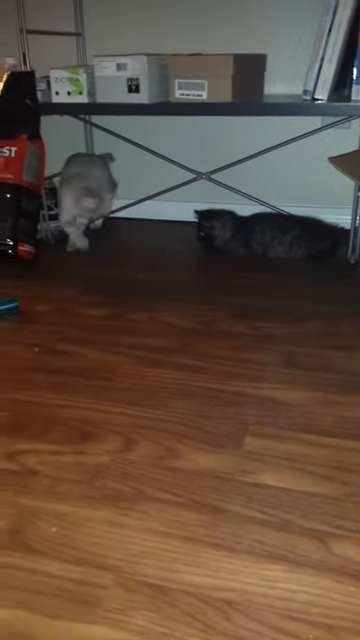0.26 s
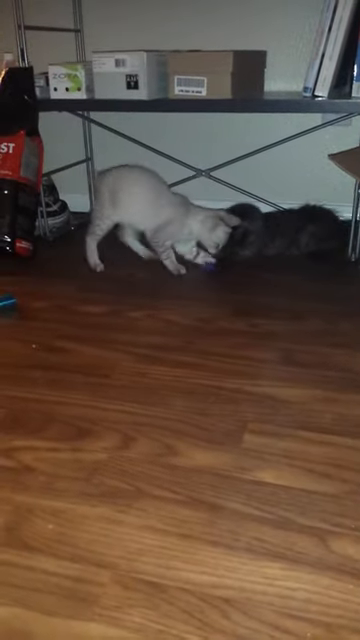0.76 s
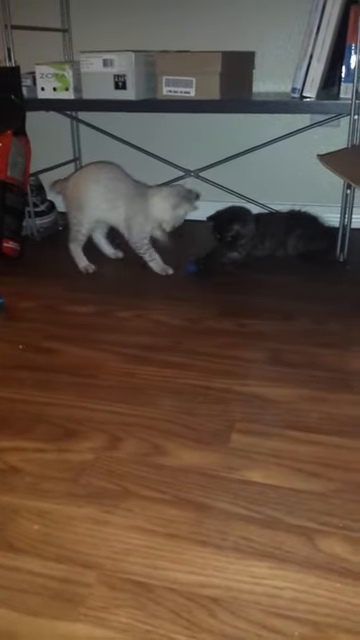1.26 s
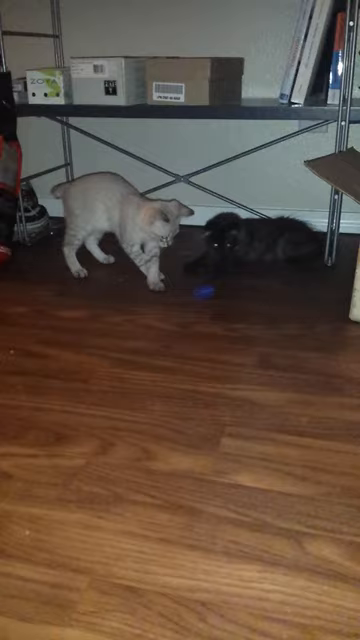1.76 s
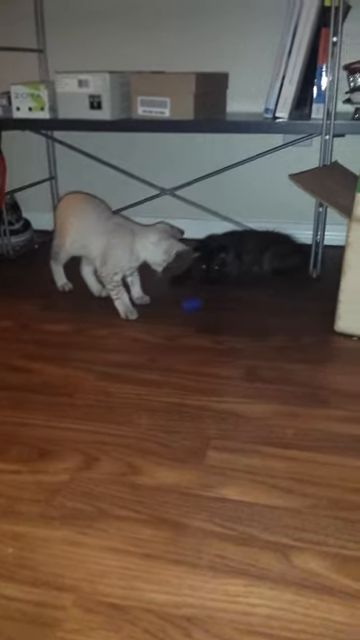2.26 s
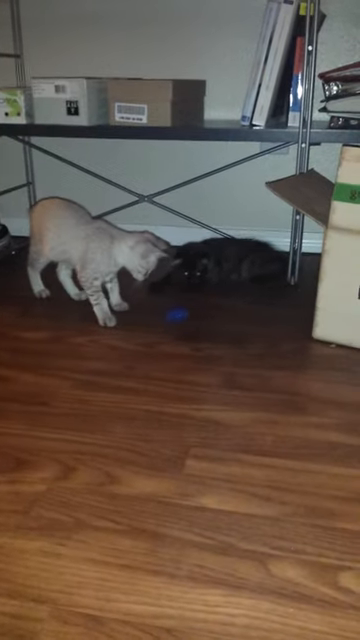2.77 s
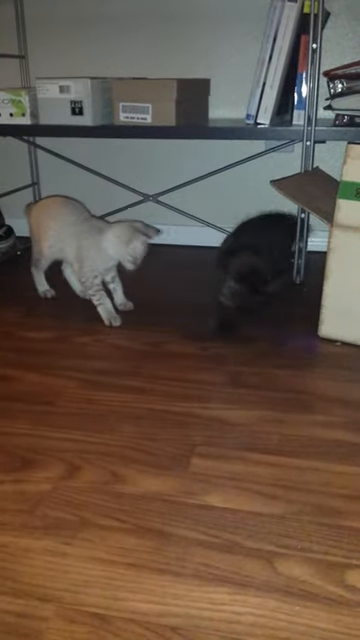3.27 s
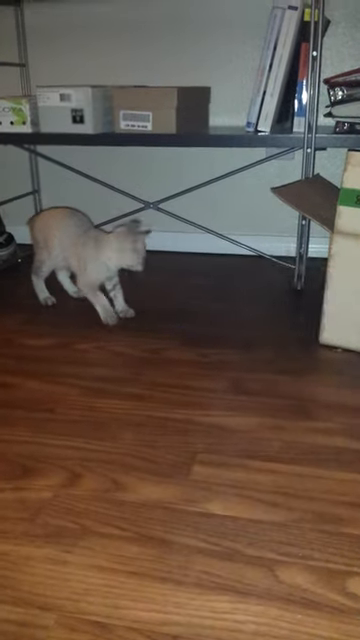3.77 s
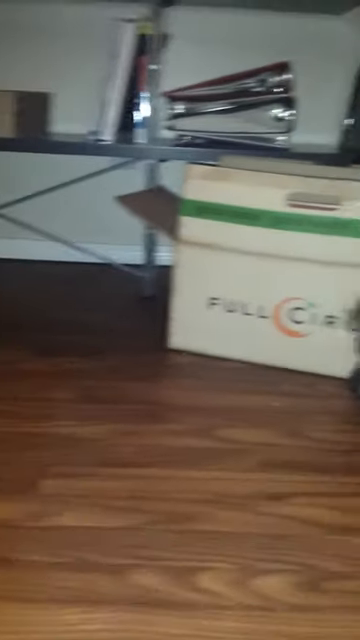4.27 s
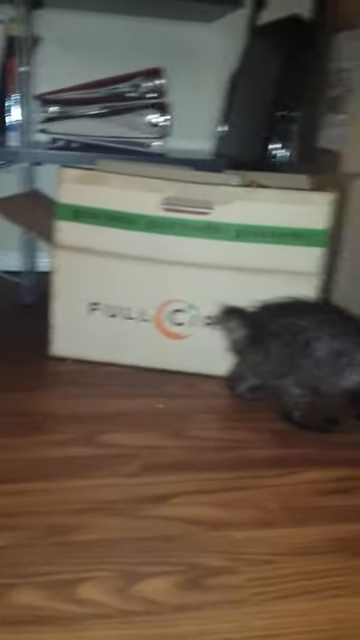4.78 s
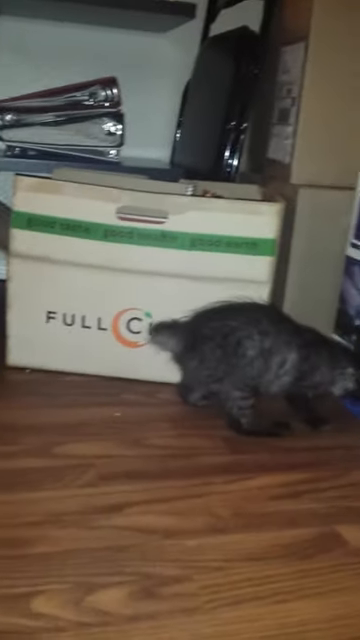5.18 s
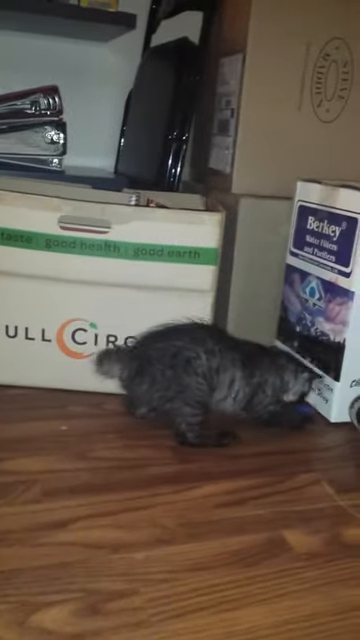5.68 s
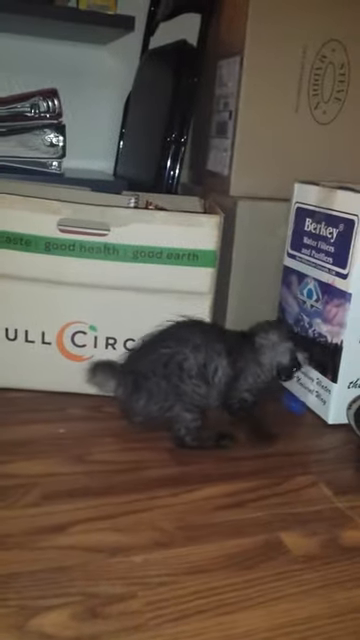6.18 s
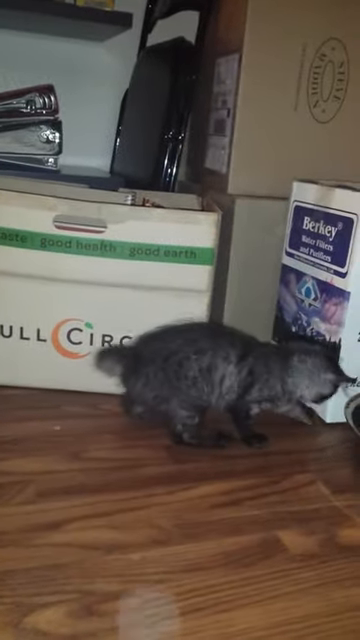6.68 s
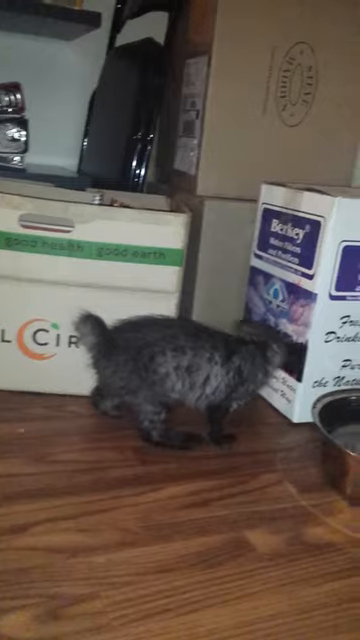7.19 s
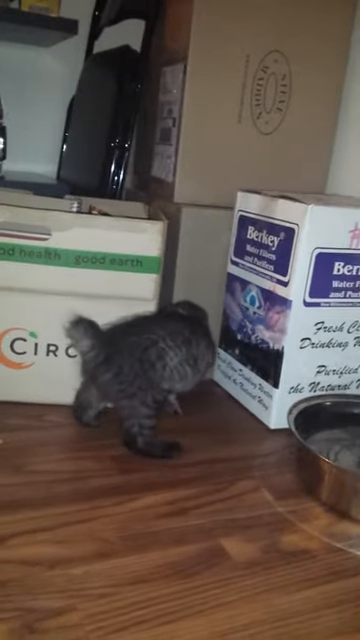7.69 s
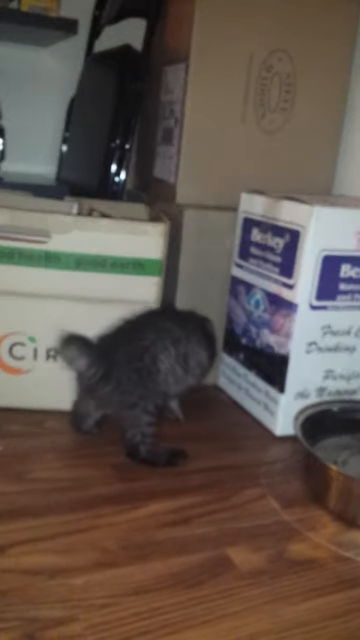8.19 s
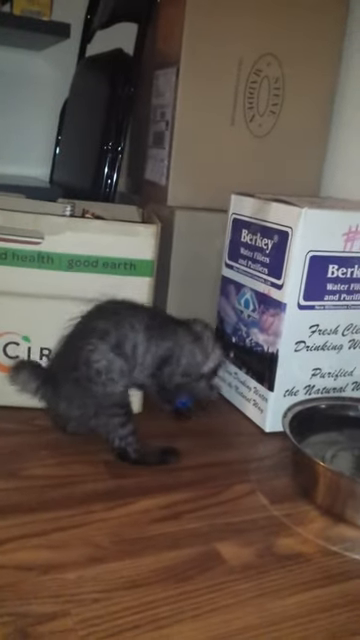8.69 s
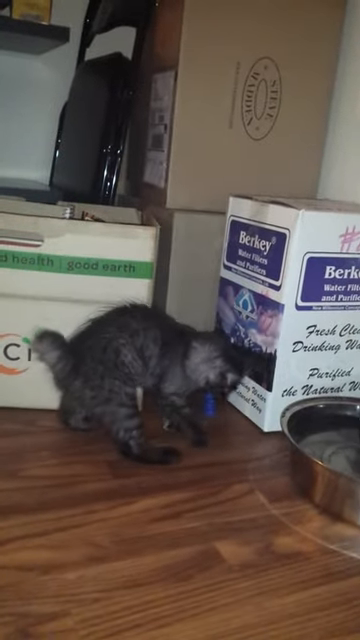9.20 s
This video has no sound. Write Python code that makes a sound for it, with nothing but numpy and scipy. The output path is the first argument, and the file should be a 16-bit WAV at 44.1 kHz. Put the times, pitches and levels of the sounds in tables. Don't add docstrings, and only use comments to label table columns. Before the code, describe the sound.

A quiet small room with a wooden floor, heard through a hand-held stereo phone. Throughout, a faint mains-pitched pump hum swells and dips under soft air hiss, while a fountain drips, spits and patters in tiny bright bubbles. The first three seconds are sparse: slight finger clicks on the phone, a faint paw rub and tick; a sharper finger click comes at 3.0. From 3.4 a hard plastic toy bumps and clacks, cracks and pings at 3.6, then clatters most loudly at 3.9-4.05 with low paw thuds. From 4.1 to 7 it is mostly water and hum, with close finger clicks around 5.2-5.4 and small ticks. Box bumps at 7.1 lead to a second burst at 7.6-7.9: knocks, pings and a rough scrape. Short rubs follow at 8.0-8.1 and a last bump at 8.3. A thin high motor hiss runs from 8.1 to 9.2, then water and hum remain until about 9.4.

```python
import sys
import numpy as np
from scipy import signal
from scipy.fft import rfft, irfft
from scipy.io import wavfile

SR = 44100
rng = np.random.default_rng(int(sys.argv[2]) if len(sys.argv) > 2 else 0)


def amplitude_ratio(level_db):
    exponent = np.asarray(level_db, float) / 20
    return 10 ** exponent


def file_out(sig):
    cols = np.atleast_2d(sig).T
    lim = np.clip(cols, -1, 1)
    pcm = np.round(lim * 32767).astype(np.int16)
    wavfile.write(sys.argv[1], SR, pcm)


N = 416744
HZ = np.maximum(np.fft.rfftfreq(N, 1 / SR), 1)


def rms_one(x):
    return x / np.sqrt(np.mean(x ** 2) + 1e-20)


def at_hz(points, hz):
    table_hz, values = np.array(points).T
    return np.interp(np.log(hz), np.log(table_hz), values)


def in_time(rows, outside=None):
    s, *columns = np.transpose(rows)
    return [np.interp(np.arange(N) / SR, s, c, outside, outside) for c in columns]


def band(x, low_hz, high_hz):
    sos = signal.butter(2, [low_hz, min(high_hz, .45 * SR)], "band", fs=SR, output="sos")
    return signal.sosfilt(sos, x)


def add(track, s, sound):
    i = round(s * SR)
    track[..., i:i + sound.shape[-1]] += sound[..., :N - i]


def stereo_pair(mid, side, likeness):
    alike = np.clip(likeness, 0, 1)
    return np.sqrt(1 + alike) * mid + np.sqrt(1 - alike) * side * [[1], [-1]]


def bubble(hz, cycles, rise):
    t = np.arange(1500) / SR
    return np.sin(2 * np.pi * hz * t * (1 + rise * hz * t / cycles)) * amplitude_ratio(-60 * t * hz / cycles)


# start_s, second_order_db, seventh_order_db
HUM_SWELL = [(0.0, -65, -65.5), (0.37, -65, -64.5), (0.97, -67, -65), (2.31, -69.5, -65), (3.1, -73, -67),
             (3.53, -72, -62.5), (4.05, -67, -60), (4.29, -72.5, -63.5), (4.82, -84.5, -63.5),
             (5.05, -79.5, -66.5), (6.18, -81, -63.5), (6.45, -69, -65), (7.27, -71.5, -65.5),
             (7.7, -64, -62), (9.0, -65.5, -63.5), (9.45, -64.5, -64.5)]
# order, level_db (rms)
STEADY_ORDERS = [(1, -109.5), (3, -78), (4, -77.5), (5, -78.5), (8, -81)]


def pump():
    mains_hz = 60.0
    turn = 2 * np.pi * mains_hz * np.arange(N) / SR
    second_db, seventh_db = in_time(HUM_SWELL)
    hum = sum(amplitude_ratio(db) * np.sin(order * turn + order) for order, db in STEADY_ORDERS)
    hum = hum + amplitude_ratio(second_db) * np.sin(2 * turn)
    seventh_lean = amplitude_ratio(np.array([[-1.5], [1.5]]))
    seventh = amplitude_ratio(seventh_db + 1.5) * np.sin(7 * turn) * seventh_lean
    return np.sqrt(2) * (hum + seventh)


# pitch_hz, level_db (per Hz)
AIR_COLOUR = [(20, -20.5), (40, -19.5), (85, -7), (180, -12), (260, -16.5), (340, -1), (390, -10),
              (520, -13.5), (700, -19), (1500, -22.5), (2600, -22), (5900, -23), (8000, -21), (14500, -25)]
# pitch_hz, likeness (0 to 1)
AIR_LIKENESS = [(60, 0.41), (130, 0.49), (290, 0.81), (640, 0.26), (1400, 0), (3000, 0.024)]


def air():
    mean_db, follows = -74.0, 1
    seventh_db = in_time(HUM_SWELL)[1]
    level_db = mean_db + follows * (seventh_db - seventh_db.mean())
    mid, side = rfft(rng.standard_normal((2, N)))
    pair = stereo_pair(mid, side, at_hz(AIR_LIKENESS, HZ))
    return amplitude_ratio(level_db + 14.5) * rms_one(irfft(pair * amplitude_ratio(at_hz(AIR_COLOUR, HZ)), N))


def strays(count, least_db, low_hz, high_hz):
    spread_db = 6.0
    when, pitch, size = rng.random((count, 3)).T
    start_s = when * (N - SR // 20) / SR
    return list(zip(start_s, least_db + spread_db * size, low_hz * (high_hz / low_hz) ** pitch))


FLICKS = [0.022, 0.243, 0.7135, 0.919, 1.14, 1.1792, 1.645, 2.4367, 2.577, 3.3832, 4.8113, 5.115, 5.2574,
          5.543, 5.6463, 5.693, 5.86, 6.1067, 6.1874, 6.675, 6.867, 6.918, 7.054, 7.1445, 8.161, 8.434,
          8.7055, 8.9896, 9.056, 9.185]
# start_s, peak_db, pitch_hz
SPLASHES = [(0.6744, -52, 5530), (0.7048, -44, 6400), (1.4414, -43, 5560), (2.3885, -43, 5240),
            (2.5306, -47, 5440), (2.7262, -46, 6840), (3.045, -45, 5250), (3.266, -42, 7180),
            (3.3604, -43, 6210), (4.1703, -40.5, 6200), (4.285, -44.5, 5760), (4.3529, -37.5, 6000),
            (4.5025, -42.5, 7300), (4.7949, -47, 6300), (4.8906, -44, 6160), (5.8056, -44.5, 6400),
            (6.162, -44, 5140), (6.279, -46.5, 7400), (8.272, -42, 5940), (8.2935, -43, 4240),
            (6.2535, -40.5, 5650), (6.3493, -44, 5100), (6.704, -46, 6040), (7.4843, -42.5, 6480),
            (8.467, -44.5, 5120), (8.5479, -42.5, 5642), (8.7195, -43.5, 5899), (8.8103, -40, 6150),
            (8.8671, -44.5, 6660), (9.1051, -43, 5418), (9.2114, -48.5, 5580), (9.2967, -47.5, 5470)]
# start_s, peak_db
SPITS = [(0.9793, -48), (1.048, -49), (1.4227, -51), (1.754, -47.5), (1.916, -44.5), (2.048, -41),
         (2.2752, -53), (2.37, -43), (2.7034, -46), (2.95, -45), (4.2458, -44.5), (4.527, -45),
         (4.708, -56), (4.97, -46), (6.312, -46), (6.578, -53.5), (7.112, -44), (7.444, -45.5),
         (9.1134, -47.5)]


def splashes():
    spit_hz, flick_db = 4434, -52
    rows = SPLASHES + [(s, db, spit_hz) for s, db in SPITS]
    rows = rows + strays(28, -61, 5130, 7400)
    chance = strays(len(FLICKS), flick_db, 5440, 7220)
    rows = rows + [(s, db, hz) for s, (_, db, hz) in zip(FLICKS, chance)]
    out = np.zeros(N)
    for s, peak_db, hz in rows:
        add(out, s, amplitude_ratio(peak_db - 3.5) * bubble(hz, cycles=60.0, rise=.02))
        for late, pitch, size in rng.random((3, 3)):
            small = bubble(hz * 1.8 ** (pitch - .4), cycles=45.0, rise=0.11)
            add(out, s + 0.015 * late, amplitude_ratio(peak_db - 9.0 - size) * small)
    return out


def patter():
    out = np.zeros(N)
    for s, peak_db, hz in strays(330, -58.5, 4090, 7800):
        add(out, s, amplitude_ratio(peak_db) * bubble(hz, cycles=40.0, rise=.04))
    return out


# start_s, pitch_hz
DRIPS = [(0.097, 3240), (0.3262, 2170), (0.483, 1870), (0.934, 3080), (0.996, 2570), (1.248, 2530),
         (1.3806, 2254), (1.437, 2920), (1.7754, 2600), (1.7987, 1950), (2.4249, 3700), (2.761, 2702),
         (2.8275, 3660), (4.609, 2270), (4.803, 3500), (5.137, 3340), (5.6565, 3570), (5.996, 2110),
         (6.462, 3550), (6.5763, 2420), (6.878, 1790), (7.2118, 2036), (7.5607, 3150), (8.149, 1980),
         (8.6454, 3350), (8.7623, 2400), (9.026, 2500), (9.4304, 2880)]
# start_s, peak_db, pitch_hz
DROPS = [(0.697, -44.5, 3630), (0.8082, -48, 3370), (0.9597, -48, 2260), (1.5655, -38, 1830),
         (1.892, -50.5, 2300), (1.945, -49.5, 2670), (2.199, -41, 3350), (2.3143, -46, 2050),
         (3.026, -44, 3050), (3.039, -42.5, 3060), (3.278, -56, 2660), (4.4812, -44, 2110),
         (4.533, -44, 1790), (4.749, -51.5, 2040), (5.299, -45, 3420), (5.599, -47.5, 2750),
         (5.8095, -47.5, 1930), (5.89, -44.5, 2680), (6.0466, -52.5, 1757), (6.0832, -43.5, 2240),
         (6.085, -49.5, 1490), (6.154, -42, 3000), (6.19, -60, 3070), (6.154, -47, 2060),
         (8.296, -43, 2930), (0.567, -49.5, 3470), (6.512, -48, 2800), (6.677, -42, 1860),
         (6.7046, -44.5, 2130), (7.422, -41.5, 2170), (7.4477, -46.5, 2080), (8.3578, -47, 1990),
         (8.414, -54, 3040), (8.435, -40.5, 3280), (8.436, -49, 2450), (6.127, -57, 2270),
         (6.24, -58, 2350), (0.647, -54.5, 2300), (8.464, -47, 1840)]


def drops():
    drip_db = -52.5
    rows = DROPS + [(s, drip_db, hz) for s, hz in DRIPS] + strays(12, -64, 1940, 4800)
    out = np.zeros(N)
    for s, peak_db, hz in rows:
        add(out, s, amplitude_ratio(peak_db - 3.5) * bubble(hz, cycles=40.0, rise=.03))
    return out


# start_s, peak_db, pitch_hz
GRIPS = [(0.4, -49, 4800), (0.49, -47, 4300), (0.629, -41.5, 4000), (1.5655, -38, 6100), (6.083, -50, 3200),
         (2.9975, -37, 10500), (3.024, -46, 5600), (2.9982, -44.5, 2780), (5.339, -51, 670),
         (5.408, -46.5, 4200), (0.936, -54, 2440), (8.459, -41, 3200), (7.056, -46, 6400),
         (2.951, -42, 8500), (2.999, -29.5, 6100), (3.131, -51, 11000), (5.2238, -46, 6200),
         (5.227, -51.5, 2500), (5.2745, -37.5, 4660), (5.3205, -38.5, 4720), (5.339, -50.5, 1590),
         (5.382, -37.5, 9550), (6.1525, -41, 6000), (8.459, -37.5, 5600)]


def grips():
    attack_s = 0.00015
    out, soft = np.zeros(N), 1 - np.exp(-np.arange(1500) / SR / attack_s)
    for s, peak_db, hz in GRIPS:
        click = bubble(hz, cycles=19.0, rise=0) + 0.53 * bubble(0.79 * hz, cycles=20.0, rise=0)
        add(out, s, amplitude_ratio(peak_db + 3.0) * soft * click)
    return out


# pitch_hz, width_hz, level_db
SLIDE_BODY = [(600, 180, -1), (1260, 260, -6), (2050, 300, -4.5), (2500, 350, -2)]
# start_s, peak_s, end_s, body_db, hiss_db
SLIDES = [
    (0.64, 0.684, 0.77, -62, -54),
    (3.49, 3.505, 3.8, -67, -52),
    (3.737, 3.76, 3.77, -59, -42.5),
    (3.828, 3.86, 3.92, -48.5, -42),
    (7.68, 7.692, 7.27, -54, -46),
    (7.767, 7.79, 7.812, -34, -33),
    (8.012, 8.035, 8.08, -49.5, -48),
    (8.04, 8.087, 8.128, -40.5, -41.5),
    (3.26, 3.28, 3.34, -61.5, -53),
]


def slides():
    edge_db, hold, catches_per_s = -18, 0.65, 5000
    strength = amplitude_ratio(1.5 * np.minimum(rng.exponential(1, N), 3))
    catches = rng.standard_normal(N) * strength * (rng.random(N) < catches_per_s / SR)
    body = sum(amplitude_ratio(db) * rms_one(band(catches, hz - width / 2, hz + width / 2))
               for hz, width, db in SLIDE_BODY)
    hiss = rms_one(band(catches, 4800, 7200))
    hiss = hiss + .35 * rms_one(band(catches, 8000, 13000)) + .25 * rms_one(band(catches, 3000, 4500))
    out = 0
    for start, peak, end, body_db, hiss_db in SLIDES:
        fade_s = peak + hold * (end - peak)
        shape = [(start, edge_db), (peak, 0), (fade_s, -2), (end, edge_db)]
        swell_db = in_time(shape, outside=-120)[0]
        out = out + amplitude_ratio(swell_db) * (amplitude_ratio(body_db - 9) * body + amplitude_ratio(hiss_db - 7.5) * hiss)
    return out


# start_s, peak_db, pitch_hz
THUDS = [(0.69, -46.5, 116), (0.9, -56, 104), (3.421, -41.5, 317.5), (3.63, -44, 90), (3.879, -45, 157),
         (3.948, -37.5, 184), (4.001, -30.5, 227), (4.011, -28.5, 177), (4.793, -51, 190),
         (5.299, -54, 214), (7.629, -43, 142), (8.307, -52, 255), (8.869, -57, 123), (9.239, -48, 123)]


def thuds():
    out, t = np.zeros(N), np.arange(6000) / SR
    for s, peak_db, hz in THUDS:
        push = np.sin(2 * np.pi * hz * t) + 0.56 * np.sin(2 * np.pi * 1.9 * hz * t)
        add(out, s, amplitude_ratio(peak_db - 0.5) * push * amplitude_ratio(-60 * t / 0.12) * (1 - np.exp(-t / 0.00074)))
    return out


# start_s, peak_db, crack_db (re peak), toy_hz
TICKS = [(0.697, -52, 4, 3270), (1.4445, -59.5, 16.5, 2730), (3.797, -43.5, 1.5, 1490),
         (3.84, -51, 8, 2050), (3.869, -40.5, 6, 2080), (3.912, -49, 7, 965), (4.794, -50, 4, 1030),
         (5.808, -52.5, 9, 1870), (6.675, -54, -5, 1830), (7.0232, -48.5, 7.5, 1503),
         (7.423, -48, 2.5, 2190), (8.0248, -56, 0, 3040), (8.046, -47, 6, 1260)]
# start_s, peak_db, knock_db (re peak), crack_db (re peak), knock_hz
BUMPS = [(3.2679, -53, 4, 11.5, 830), (3.276, -51.5, 1, 8, 835), (3.4213, -37.5, 9, 8, 507),
         (3.426, -38.5, 8, -3, 407), (3.434, -39.5, 8.5, -7, 500), (3.4755, -32, 11.5, -12, 950),
         (4.0118, -22.5, 5.5, -1, 605), (7.1114, -34.5, 4.5, -1, 640), (7.1444, -32.5, 0, -9, 620),
         (7.6274, -20.5, 3, -10, 490), (7.6385, -31.5, 6.5, -17, 560), (7.682, -43, 6, -9, 915),
         (7.687, -30, 5, -5, 895), (7.7788, -29, 6.5, -4, 607), (7.7885, -28, 3.5, -5, 620),
         (7.795, -46, 4, -9, 603), (7.832, -27.5, -7, -14, 600), (7.859, -41, 6, -9, 684),
         (8.2915, -38.5, 2, -2, 510), (8.296, -39, -4, 4, 1020), (8.3072, -25, -1.5, -7.5, 510),
         (8.3238, -45, 13.5, -4, 503)]
# start_s, peak_db, knock_db (re peak), crack_db (re peak), toy_hz
CLACKS = [(3.467, -23, -6, -6, 2100), (3.4722, -23, -5, -3, 1680), (3.492, -36, -4, 8, 1470),
          (3.4948, -33.5, -18, 1, 1654), (3.6319, -22.5, -13.5, 4, 1880), (3.6366, -24.5, -9.5, 7, 1004),
          (3.859, -36.5, -17, -3, 984), (3.9449, -15, -16, 6.5, 1640), (3.9485, -19.5, -13, 4.5, 3110),
          (3.9527, -16.5, -7.5, -3, 1540), (3.994, -18, -4.5, -12, 1294), (3.9994, -15.5, -18, -2, 2620),
          (4.0011, -7.5, -32.5, -2.5, 1785), (4.0123, -23.5, -18.5, 5, 1350), (4.023, -28, -11.5, -2, 1180),
          (4.031, -19, -7, -3.5, 1014), (4.038, -22, -7, -5, 970), (6.7048, -39, -21, -1, 1165),
          (7.1445, -30, -15, -5.5, 1920), (7.6053, -18, -18, 4, 2950), (7.6324, -16, -14, -7.5, 1280),
          (7.6574, -21.5, -25.5, 2, 2630), (7.664, -30.5, -9, 6, 2786), (7.7618, -24.5, 0, -3.5, 1294),
          (7.791, -26, -24, -8, 2320), (7.8218, -20.5, 1, -2, 2795), (7.8243, -34, 0, 7, 2540),
          (8.0754, -38, -17, -10, 2490), (8.2781, -29, -7.5, -11.5, 1230)]


def contacts():
    board_hz, toy_on_box_hz = 585, 989
    tick_knock_hz, tick_knock_db = 434, -1.5
    ticks = [(s, db, tick_knock_db, crack_db, tick_knock_hz, hz) for s, db, crack_db, hz in TICKS]
    bumps = [(*row, toy_on_box_hz) for row in BUMPS]
    clacks = [(*row, board_hz, hz) for *row, hz in CLACKS]
    return ticks + bumps + clacks


def ringing(main_hz, others, span, below, t60):
    contact_s, main_weight = 0.0019, 1.84
    t = np.arange(2400)[:, None] / SR
    place = (np.arange(others) + rng.random(others)) / others - below
    hz = main_hz * np.r_[1, span ** place]
    gains, turns = rng.random((2, others + 1))
    gains[0] = main_weight
    fade = amplitude_ratio(-60 * np.maximum(t - contact_s, 0) / t60) * (1 - np.exp(-t / 0.000043))
    rings = (gains * np.sin(2 * np.pi * (hz * t + turns)) * fade).sum(axis=1)
    return rings / np.abs(rings).max()


# pitch_hz, level_db
CRACK_COLOUR = [(2500, 5.5), (3500, 6), (4800, 4), (6000, 3.5), (7500, -3), (10000, -19), (15000, -21)]


def blows():
    out, t = np.zeros(N), np.arange(2400) / SR
    snap_db = 1.5
    colour = amplitude_ratio(at_hz(CRACK_COLOUR, np.maximum(np.fft.rfftfreq(2400, 1 / SR), 1)))
    snap = band(1. * (np.arange(2400) == 0), 1504, 8500) * 2
    crack_fade = amplitude_ratio(-60 * t / 0.0071) + 0.39 * amplitude_ratio(-60 * t / 0.055)
    for s, peak_db, knock_db, crack_db, knock_hz, toy_hz in contacts():
        knock = ringing(knock_hz, others=7, span=2.0, below=.42, t60=0.021)
        knock = knock * (1 - np.exp(-t / 0.00088))
        body = ringing(toy_hz, others=11, span=2.8, below=.45, t60=0.024)
        grit = irfft(rfft(rng.standard_normal(2400)) * colour)
        crack = band(grit * crack_fade, 2820, 13800)
        crack = crack / np.abs(crack).max() + amplitude_ratio(snap_db) * snap
        blow = body + amplitude_ratio(knock_db) * knock + amplitude_ratio(crack_db + 4.5) * crack
        add(out, s, amplitude_ratio(peak_db - 2.5) * blow)
    return band(out, 98, 15000)


# start_s, peak_db, pitch_hz
PINGS = [(3.42, -42, 7650), (3.492, -38, 7660), (3.634, -17.5, 6240), (3.632, -33, 9800),
         (3.632, -23, 1850), (3.637, -27, 1150), (3.4945, -33.5, 1620), (3.994, -24, 1500),
         (4.03, -24.5, 1000), (3.945, -22, 4200), (4.003, -18, 4000), (4.002, -24.5, 5200),
         (4.014, -24, 5600), (3.869, -37, 7400), (3.911, -40.5, 6300), (7.607, -22.5, 8400),
         (7.606, -22.5, 5200), (7.629, -32, 8600), (7.632, -26, 4540), (7.6572, -29.5, 8900),
         (7.662, -31, 11700), (7.664, -30, 6600), (7.685, -28, 4660), (7.761, -38, 8100),
         (7.7864, -37, 9100), (7.79, -36, 4450), (7.8238, -27.5, 7660), (8.024, -43, 3150)]


def pings():
    out = np.zeros(N)
    for s, peak_db, hz in PINGS:
        ping = bubble(hz, cycles=65.0, rise=0) + 0.75 * bubble(0.86 * hz, cycles=50.0, rise=0)
        add(out, s, amplitude_ratio(peak_db - 3.0) * ping)
    return out


# start_s, level_db
WHINE = [
    (8.1, -65),
    (8.2, -64.5),
    (9.15, -65.5),
    (9.22, -83),
]


def whine():
    centre_hz, width_hz = 10640, 1400
    low_hz, high_hz = centre_hz - width_hz / 2, centre_hz + width_hz / 2
    noise = band(rng.standard_normal((2, N)), low_hz, high_hz)
    core = band(noise, low_hz, high_hz)
    return amplitude_ratio(in_time(WHINE, outside=-120)[0]) * rms_one(core)


# pitch_hz, likeness (0 to 1)
ROOM_LIKENESS = [(60, 0.85), (130, 0.97), (290, 0.92), (640, 0.6), (1400, 0.18), (3000, 0.2), (7000, 0.05)]
# pitch_hz, level_db
ROOM_COLOUR = [(120, 4.5), (600, -5.5), (2000, -1), (6000, -5), (12000, 2)]
# pitch_hz, t60_s
ROOM_T60 = [(100, 0.33), (500, 0.31), (2000, 0.27), (6000, 0.33), (12000, 0.25)]


def reflections(early_db):
    early_t60_s = 0.03
    t, edges = np.arange(SR // 3) / SR, 60 * 2 ** np.arange(0, 8.6, 1.0)
    tail = 0
    for low, high in zip(edges, edges[1:]):
        hz = np.sqrt(low * high)
        mid, side = band(rng.standard_normal((2, len(t))), low, high)
        pair = stereo_pair(mid, side, at_hz(ROOM_LIKENESS, hz))
        fade = amplitude_ratio(-60 * t / at_hz(ROOM_T60, hz)) + amplitude_ratio(early_db - 60 * t / early_t60_s)
        tail = tail + pair * amplitude_ratio(at_hz(ROOM_COLOUR, hz)) * fade
    tail = tail * (1 - np.exp(-(t / 0.0027) ** 2))
    return tail / np.sqrt(np.sum(tail ** 2, axis=1, keepdims=True))


def room(x, early_db):
    paths, path_s = 5, .012
    turn = np.arange(N) / (SR * path_s) % paths
    out = 0
    for k in range(paths):
        apart = np.abs((turn - k + paths / 2) % paths - paths / 2)
        share = np.cos(np.pi / 2 * np.minimum(apart, 1))
        out = out + signal.oaconvolve((x * share)[None], reflections(early_db), axes=1)[:, :N]
    return out


# start_s, left_right_db, reflected_db
PLACE = [(0, 2, 0), (3.0, -4, 11.5), (3.45, 0, -4), (3.6, 3.5, -2), (3.9, 4, -2), (4.1, 5, 0),
         (5.3, -14, 0.5), (6.7, -3, -1.5), (7.12, -2, -2.5), (7.6, 2, -0.5), (7.75, 1.5, -2.5),
         (8.0, -0.5, -1.5), (8.3, 0.5, -1.5), (9.45, -2, -1)]


def scene():
    water = drops() + splashes() + patter()
    play, paws = blows() + pings() + slides(), thuds()
    side_db, wet_db = in_time(PLACE)
    direct = amplitude_ratio(side_db * [[.5], [-.5]]) * play
    near = direct + room(amplitude_ratio(wet_db) * play + amplitude_ratio(-5.0) * paws, early_db=3.5)
    far = water + amplitude_ratio(7.0) * room(water, early_db=10.0)
    return near + far + paws + grips() + air() + pump() + whine()


# pitch_hz, left_right_db
PORT_COLOUR = [(300, 0.5), (2400, -0.4), (4400, 2), (6000, 12), (8100, -3.5), (11000, -12), (15000, -10.5)]


def ports():
    right_lag_s = 2.5 / SR
    hz = np.maximum(np.fft.rfftfreq(1024, 1 / SR), 1)
    fold = np.r_[1, 2 * np.ones(511), 1, np.zeros(511)]
    cepstrum = irfft(np.log(amplitude_ratio(at_hz(PORT_COLOUR, hz) * [[.5], [-.5]]))) * fold
    lag = np.exp(-2j * np.pi * hz * (16 / SR + right_lag_s * np.array([[0], [1]])))
    return irfft(np.exp(rfft(cepstrum)) * lag)


def low_pass(x):
    return signal.sosfilt(signal.butter(12, 15590, fs=SR, output="sos"), x)


def record(dry):
    ceiling, top_hz = 1.1, 14650
    heard = signal.oaconvolve(dry, ports(), axes=1)[:, 16:N + 16]
    rounded = ceiling * np.tanh(heard / ceiling)
    top_cut = 1 / (1 + (HZ / top_hz) ** 150)
    return low_pass(irfft(rfft(rounded) * top_cut, N))


dry = scene()
out = record(dry)
file_out(out)
```